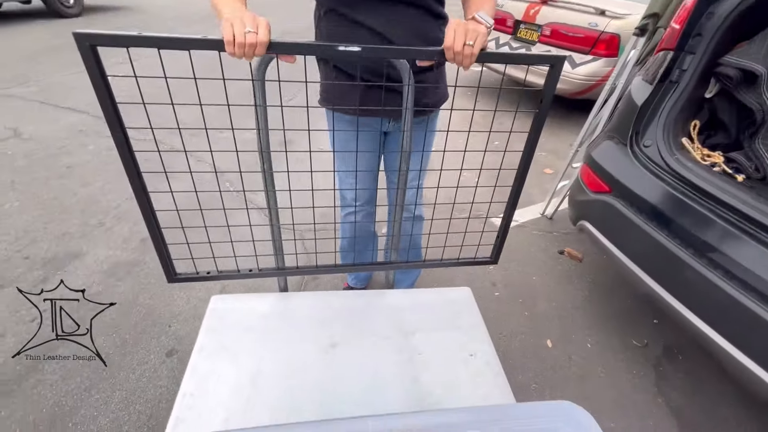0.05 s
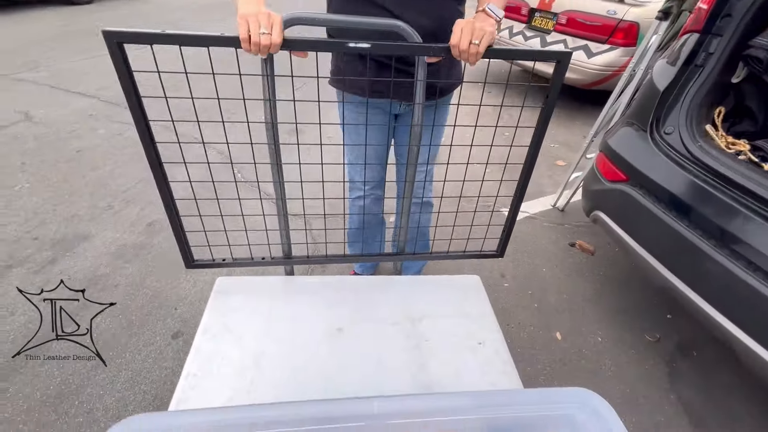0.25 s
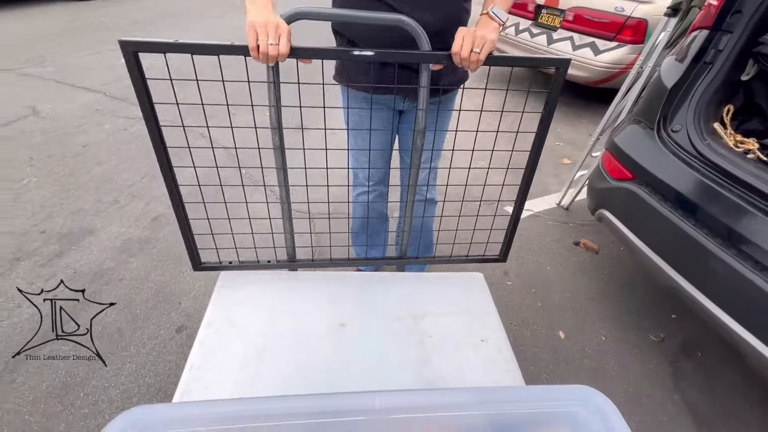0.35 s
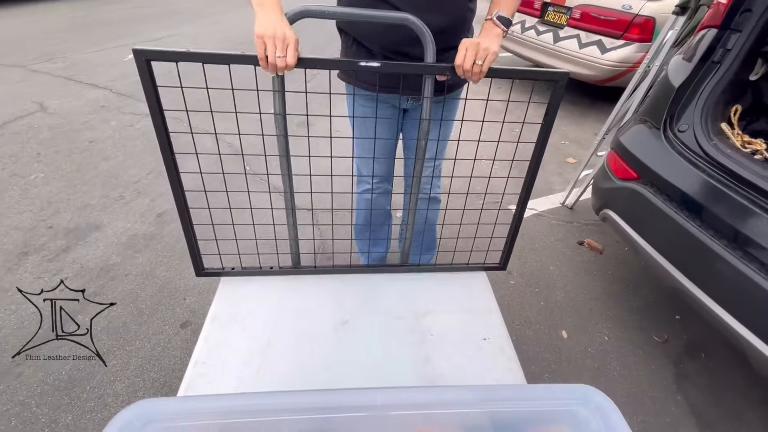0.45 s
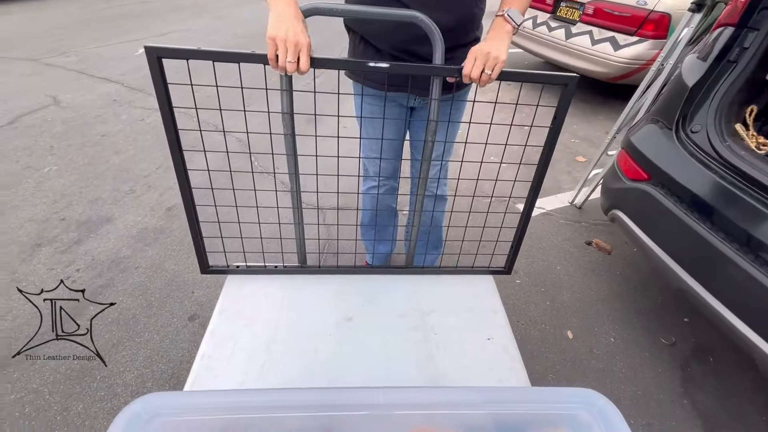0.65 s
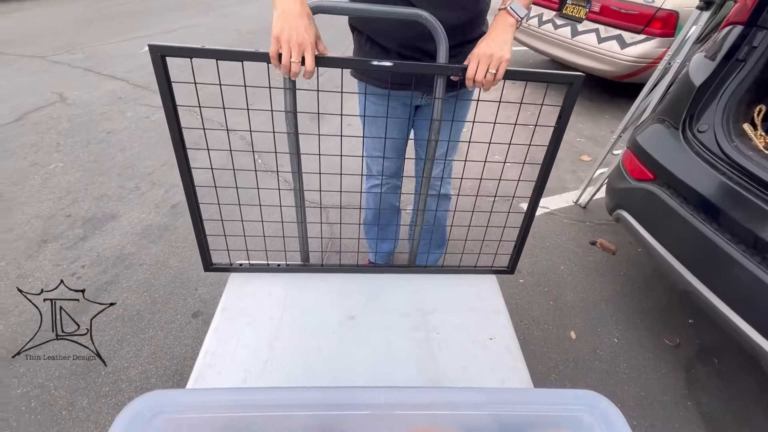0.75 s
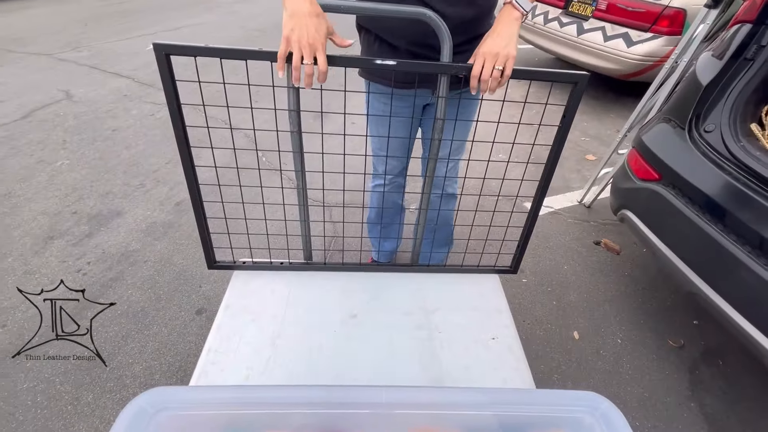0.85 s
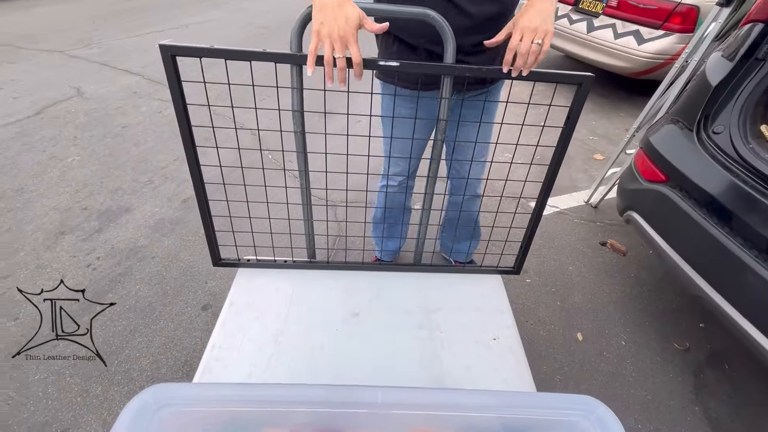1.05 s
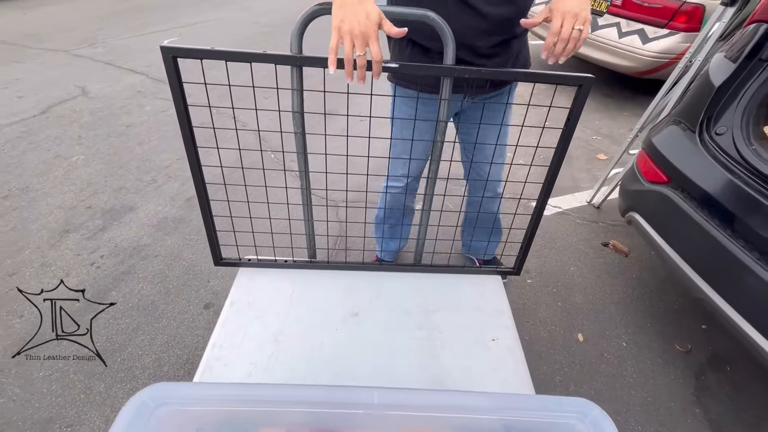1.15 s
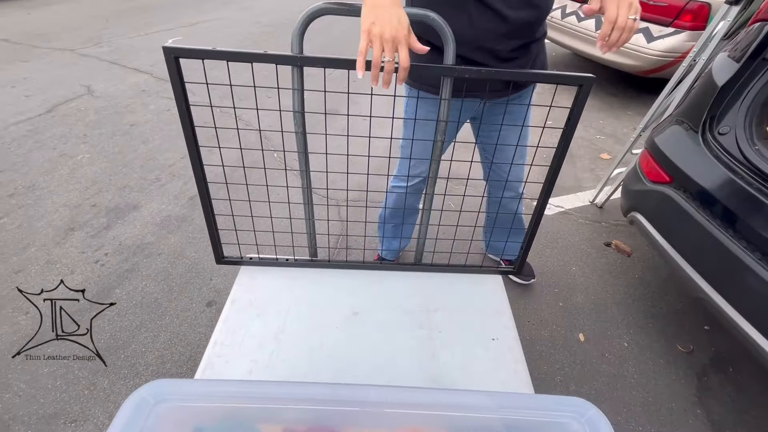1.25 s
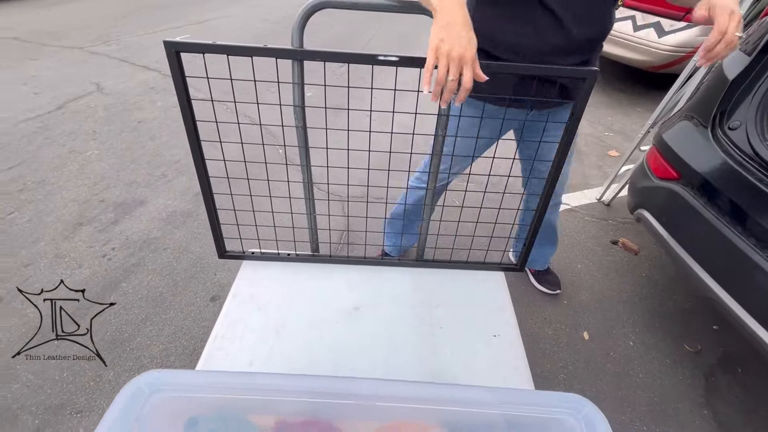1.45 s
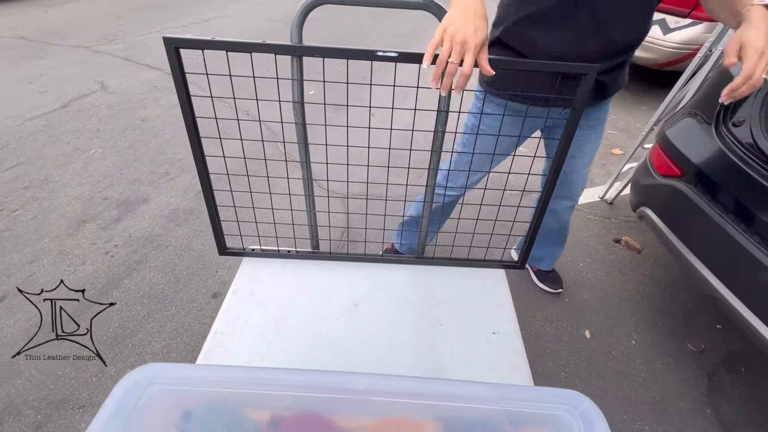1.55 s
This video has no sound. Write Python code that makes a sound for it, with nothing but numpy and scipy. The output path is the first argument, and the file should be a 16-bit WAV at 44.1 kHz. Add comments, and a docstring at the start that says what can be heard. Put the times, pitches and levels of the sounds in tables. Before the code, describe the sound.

A metal wire panel clanks against a cart's handle, then drops onto the plastic deck with a thud and a small bounce, wires ringing. A faint shoe scuff follows. Heard close by, outdoors, over low distant traffic.

```python
"""Wire panel dropped on a cart

In a car park a steel-framed wire panel knocks against a cart's tubular handle, then drops onto its
plastic deck and bounces. Each impact excites damped normal modes: the handle hums, the deck thuds, the
wires ring and chatter against each other. A shoe then scuffs the asphalt, the wires tick faintly and
a hand brushes the frame, over a low rumble of distant traffic."""
import sys
import numpy as np
from scipy import signal
from scipy.fft import rfft, irfft
from scipy.io import wavfile

SR = 44100
rng = np.random.default_rng(int(sys.argv[2]) if len(sys.argv) > 2 else 0)


def store_wav(level_fs):
    """Save 16-bit WAV to argv[1]."""
    pcm = np.round(np.clip(np.atleast_2d(level_fs), -1, 1) * 32767)
    wavfile.write(sys.argv[1], SR, pcm.T.astype(np.int16))


N = 70560
T = np.arange(N) / SR
HZ = np.arange(N // 2 + 1) * SR / N
SIDES = np.array([[1], [-1]])  # left, right
TOP_HZ = 15600


def undb(db):
    """Amplitude ratio of a level in decibels."""
    return 10 ** (np.asarray(db) / 20)


def unit(x):
    """Normalisation to an rms of 1."""
    return x / np.sqrt(np.mean(x ** 2))


def pan(db):
    """Level-difference panning: two gains, the left db above the right."""
    return undb(SIDES * db / 2)


def at_hz(hz, table, column=1):
    """Interpolation of a table's column over log frequency."""
    table = np.array(table, float)
    return np.interp(np.log(np.maximum(hz, 1)), np.log(table[:, 0]), table[:, column])


def through(x, response):
    """Convolution: the output of a linear system with this impulse response."""
    return signal.fftconvolve(np.atleast_2d(x), np.atleast_2d(response), axes=1)[:, :N]


def colour(x, spectrum):
    """Minimum-phase filtering: folding the cepstrum makes the response causal."""
    hz = np.arange(N + 1) * SR / (2 * N)
    cepstrum = irfft(np.log(undb(at_hz(hz, spectrum))))
    cepstrum[1:N] *= 2
    cepstrum[N + 1:] = 0
    return irfft(rfft(x, 2 * N) * np.exp(rfft(cepstrum)))[..., :N]


def fade(t60_s):
    """Exponential decay, by 60 dB in t60_s."""
    return np.exp(-np.log(1000) * T / t60_s)


def build_up(rise_s):
    """First-order rise from 0 towards 1."""
    return 1 - np.exp(-T / rise_s)


def push(start_s, level_db, contact_ms):
    """Force pulse of an impact: the longer the contact, the narrower its bandwidth."""
    age = np.maximum(T - start_s, 0) / (max(contact_ms, .03) / 4000)
    force = age * np.exp(-np.minimum(age, 60))
    return undb(level_db) * force / force.sum()


def ring(modes, spread_rad=0):
    """Superposition of damped modes, each shifted in phase oppositely left and right."""
    return sum(undb(db) * fade(t60) * np.cos(2 * np.pi * hz * T + SIDES * spread_rad * (-1) ** i)
               for i, (hz, db, t60) in enumerate(modes))


def burst(envelope):
    """Diffuse impulse response: enveloped stereo noise of unit energy."""
    return unit(rng.standard_normal((2, N)) * envelope) / np.sqrt(N)


def stereo_noise(correlation):
    """Partial coherence: mid and side noise mix into correlated left and right spectra."""
    alike = at_hz(HZ, correlation)
    mid, side = rfft(rng.standard_normal((2, N)))
    return (mid * np.sqrt(1 + alike) + side * np.sqrt(1 - alike) * SIDES) / np.sqrt(2)


def grains(spells, per_s):
    """Shot noise: tiny random impacts whose strength swells and dies with each spell."""
    envelope = sum(undb(db) * np.clip((T - s) / rise, 0, 1) * np.exp(-np.maximum(T - s - rise, 0) / fall)
                   for s, db, rise, fall in spells)
    impacts = (rng.random(N) < per_s / SR) * rng.standard_normal(N)
    return envelope * unit(impacts)


def rub(spells, spectrum, per_s):
    """Rough contact: filtered shot noise, partly common to left and right."""
    shared, left, right = (grains(spells, per_s) for _ in range(3))
    return colour(undb(-2) * shared + np.array([left, right]), spectrum)


def traffic():
    """Broadband noise of distant traffic: the bass swells, the airy band above it less so."""
    # noise spectrum: frequency_hz, level_db
    spectrum = [(15, -56), (25, -5.5), (64, 0.5), (130, -5.5), (354, -17.5), (439, -23.5), (575, -18),
                (936, -27.5), (1020, -24.5), (1370, -27), (2690, -38), (3430, -40), (5570, -49.5),
                (12500, -63), (16000, -77)]
    # left-right coherence: frequency_hz, correlation
    coherence = [(30, 0.3), (70, 0.27), (150, 0.88), (300, 0.78), (600, 0.04), (2000, 0), (16000, 0)]
    # swell of the bass: time_s, level_db
    swell = [(0, -7), (.3, -1), (.65, 5), (.9, 0), (1.15, 1), (1.4, -2.5), (1.6, -2)]
    crossover_hz = 306
    noise = unit(irfft(undb(at_hz(HZ, spectrum)) * stereo_noise(coherence), N))
    bass = irfft(rfft(noise) / (1 + (HZ / crossover_hz) ** 4), N)
    air = pan(1.5) * (noise - bass)
    swell_db = np.interp(T, *np.array(swell).T)
    return undb(-40 + swell_db) * bass + undb(-38.5 + 0.41 * swell_db) * air


def reflections(direct):
    """Reverberation: parked cars scatter the direct sound into a faint diffuse tail."""
    # response of the reflecting paths: frequency_hz, gain_db
    spectrum = [(50, -7.5), (200, -10.5), (600, 0.5), (2000, 2), (5000, 5), (9000, -14), (15000, -20)]
    tail = burst(fade(t60_s=1) * build_up(0.0074))
    return undb(-13) * colour(through(direct, tail), spectrum)


def hand():
    """Friction noise: a hand brushes the frame as it lets go."""
    # strokes: start_s, level_db, rise_s, fall_s
    strokes = [(1.448, -0.5, 0.0099, 0.071), (1.54, -1, 0.0085, 0.007)]
    # friction spectrum: frequency_hz, level_db
    spectrum = [(400, -5), (1200, -2), (2200, -1), (3800, -1.5), (6000, -5.5), (9000, -12.5), (15000, -14)]
    return undb(-48) * rub(strokes, spectrum, per_s=12000)


def shoe():
    """Friction and fracture: grit crunches under a sole and one piece snaps."""
    # scuffs on asphalt: start_s, level_db, rise_s, fall_s
    scuffs = [(1.105, -8.5, 0.026, 0.09), (1.1412, 3.5, 0.002, 0.0067), (1.161, -2, 0.0028, 0.029),
              (1.195, -2.5, 0.014, 0.023)]
    # crunch spectrum: frequency_hz, level_db
    spectrum = [(80, -24), (200, 5), (450, -4.5), (800, 5.5), (1300, 0.5), (1900, -7), (3500, -10),
                (5000, -15.5), (8000, -25.5), (15000, -36)]
    # modes of the snap: pitch_hz, level_db, t60_s
    snap_modes = [(261, -31, 0.054), (760, -35, .025), (980, -40, 0.024), (2900, -32, 0.045),
                  (3046, -36.5, 0.052)]
    crunch = undb(-32) * rub(scuffs, spectrum, per_s=4000)
    snap = through(push(1.1415, 0, contact_ms=0.21), ring(snap_modes, spread_rad=0.79))
    return crunch + snap


def rocking():
    """Damped oscillator: the cart bumps on its wheels at one low resonance."""
    # bumps: start_s, level_db
    bumps = [(0.565, -33), (0.845, -24.5), (1.12, -23), (1.276, -27.5), (1.386, -30)]
    pitch_hz = 77.6
    response = np.sin(2 * np.pi * pitch_hz * T) * fade(t60_s=0.12) * build_up(0.008)
    return through(sum(push(s, db, contact_ms=0.69) for s, db in bumps), response)


def judder():
    """Intermittent contact: the frame rattles dully against the cart, before and as it lands."""
    # spells of juddering: start_s, level_db, rise_s, fall_s
    spells = [(.28, -10, 0.0082, 0.12), (.431, -5, 0.0033, 0.033), (.488, 3, 0.0043, 0.029)]
    # judder spectrum: frequency_hz, level_db
    spectrum = [(60, -11.5), (150, -7.5), (260, 5.5), (420, 1), (700, -4), (950, -14.5), (1300, -13.5),
                (2500, -28), (8000, -37)]
    return undb(-14) * rub(spells, spectrum, per_s=1200)


def landing():
    """Contact time sets brightness: the steel frame knocks, then the yielding deck thuds."""
    # frame meets deck: start_s, thud_db, thud_contact_ms, knock_db
    landings = [(0.428, -15.5, 1.68, -19.5), (0.4379, -15.5, 2.04, -31), (0.458, -21, 1.6, -35),
                (0.4828, 2.5, 2.17, -0.5), (0.5194, -17.5, 1.5, -36), (.557, -24, 2.9, -15.5)]
    # modes of the plastic deck: pitch_hz, level_db, t60_s
    deck_modes = [(64.6, -26, .4), (137.8, -21, 0.22), (166.3, -9, 0.14), (187, -15, 0.174),
                  (225.6, -15.5, 0.18), (244, -26, 0.183), (281.5, -30, 0.42), (356.5, -24, 0.105),
                  (431, -18.5, 0.18), (464, -31, 0.11), (503, -18.5, 0.099), (657, -19, 0.13),
                  (727, -12, 0.09), (740, -28, 0.24)]
    # modes of the steel frame: pitch_hz, level_db, t60_s
    frame_modes = [(1556, -21, 0.053), (1613, -26.5, .04), (2125, -31, 0.077), (2400, -36, 0.084),
                   (2796, -36, 0.034)]
    # spectrum of the frame's clack: frequency_hz, level_db
    clack_spectrum = [(200, -1), (700, 2.5), (1100, -17), (1650, 12), (2000, 2.5), (2700, -6), (4000, -6),
                      (8000, -14), (15000, -19)]
    deck_lag_s, clack_fall_s, tick_fall_s = 0.006827, 0.0076, 0.0012
    deck_force = sum(push(s + deck_lag_s, db, ms) for s, db, ms, _ in landings)
    thud = through(deck_force, ring(deck_modes, spread_rad=0.05))
    frame_force = sum(push(s, db, contact_ms=0.17) for s, _, _, db in landings)
    clack = undb(7.5) * colour(burst(np.exp(-T / clack_fall_s)), clack_spectrum)
    knock = through(frame_force, ring(frame_modes) + clack)
    # steel touches the deck just ahead of the heaviest landing
    tick = through(push(0.4805, -6.5, contact_ms=0.03), burst(np.exp(-T / tick_fall_s)))
    return thud + pan(3.5) * knock + tick


def handle():
    """Impact excitation: the frame clanks on the tubular handle, whose low modes hum just after."""
    # steel meets handle: start_s, level_db, contact_ms
    contacts = [(0.1971, -6.5, 0.15), (0.2011, 0.5, 0.14), (0.212, -14, 0.26)]
    # short ring of the contact: pitch_hz, level_db, t60_s
    clank_modes = [(1810, -20.5, 0.038), (2202, -23, 0.055), (2710, -24, 0.078), (3030, -28, 0.033),
                   (3990, -24.5, 0.029)]
    # spectrum of the opening crack: frequency_hz, level_db
    crack_spectrum = [(100, -2), (700, 1.5), (1300, 2), (2200, 6.5), (4000, 3), (5600, -12), (9000, 10.5),
                      (15000, -8)]
    # modes of the tube: pitch_hz, level_db, t60_s
    tube_modes = [(104, -49, .3), (198.6, -26, 0.45), (221, -22, 0.15), (279, -31, 0.32), (391, -22, 0.21),
                  (526, -25.5, 0.13), (648, -38.5, 0.35), (790, -30.5, 0.12)]
    crack_fall_s = 0.005
    crack = undb(3.5) * colour(burst(np.exp(-T / crack_fall_s)), crack_spectrum)
    force = sum(push(*contact) for contact in contacts)
    clank = through(force, crack + ring(clank_modes, spread_rad=1))
    hum = ring(tube_modes, spread_rad=0.19) * build_up(0.0032)
    return clank + through(push(0.206, 0, contact_ms=0.1), hum)


def wire_response():
    """Modal overlap: countless wire modes merge into noise whose highest bands die soonest."""
    # dense wire modes: frequency_hz, level_db, t60_s
    bands = [(696.4, 4, 0.74), (1117, -2, 0.61), (2200, -2, 1), (4360, 0.5, 0.94), (5640, -3.5, 0.8),
             (6200, 5, 0.79), (9300, -1.5, 0.24), (13000, 2, 0.17), (16000, -4, 0.157)]
    # left-right coherence: frequency_hz, correlation
    coherence = [(700, 0.1), (2000, -0.4), (4500, 0.059), (8000, -0.45), (13000, 0.62)]
    spectrum = stereo_noise(coherence) * undb(at_hz(HZ, bands))
    edges_hz = np.geomspace(bands[0][0], TOP_HZ, 15)
    response = np.zeros((2, N))
    for low, high in zip(edges_hz, edges_hz[1:]):
        band = irfft(spectrum * (HZ >= low) * (HZ < high), N)
        response += band * fade(at_hz(np.sqrt(low * high), bands, column=2))
    return response


def chatter(wires):
    """Random collisions: loose wires strike each other and ring briefly, damped by the contact."""
    # spells of chattering: start_s, level_db, rise_s, fall_s
    spells = [(.216, -1, 0.003, 0.038), (.30, -25, 0.016, 0.082), (.44, -20, 0.0074, 0.05),
              (.493, -12.5, 0.017, 0.011), (.525, -17, 0.0044, 0.015), (.70, -37.5, 0.024, 0.033),
              (.81, -31, 0.013, 0.012), (1.365, -25.5, .002, 0.0039), (1.40, -41.5, 0.011, 0.033),
              (1.54, -25.5, 0.0042, 0.0051)]
    # collision spectrum: frequency_hz, level_db
    spectrum = [(500, -23), (2000, -28), (4500, 1), (7000, -3), (9200, 3.5), (10500, 1), (13000, 1.5),
                (14500, 0), (16000, -25)]
    # thin ring of the wires: pitch_hz, level_db, t60_s
    thin_modes = [(6530, -35, 0.194), (8800, -45, 0.19), (9290, -43.5, 0.12), (11258, -55, .15),
                  (12600, -49, 0.12), (13959, -43, .15)]
    # stereo balance: frequency_hz, left_minus_right_db
    balance = [(2000, -8), (4500, 7.5), (8000, -6), (12000, -3.5), (15000, 5)]
    damping_s = 0.084
    damped = unit(wires * np.exp(-T / damping_s)) / np.sqrt(N)
    collisions = colour(grains(spells, per_s=1100), spectrum)
    rattle = through(collisions, damped + ring(thin_modes, spread_rad=0.37))
    return undb(-22.5) * irfft(rfft(rattle) * pan(at_hz(HZ, balance)), N)


def panel():
    """Free vibration: blows ring the grid until the deck damps it; its loose wires chatter on."""
    # blows to the grid: start_s, level_db, contact_ms
    blows = [(.198, 2.5, 0.11), (0.427, -12.5, 0.05), (0.4818, -5, 0.11), (.557, -11, 0.32)]
    # strongest modes of the free grid: pitch_hz, level_db, t60_s
    grid_modes = [(1911, -36, .55), (2049, -38.5, .75), (2150, -44, .4), (2390, -49, 1.), (2422, -44, .5),
                  (2803, -51, 1.), (3215, -43, .6), (3343, -51, .8), (4284, -38, .6), (4721, -41, .55),
                  (4791, -37, .45), (5464, -40, .45), (6336, -40, .42), (6686, -38, .4)]
    damped_from_s, damping_db_per_s = 0.37, 13
    wires = wire_response()
    force = sum(push(*blow) for blow in blows)
    loss_db = damping_db_per_s * np.maximum(T - damped_from_s, 0)
    tones = undb(1.5 - loss_db) * through(force, ring(grid_modes, spread_rad=0.79))
    shimmer = undb(-24) * through(force, wires)
    return tones + shimmer + chatter(wires)


def scene():
    """Superposition of the near sources, their reflections and the traffic."""
    direct = panel() + handle() + landing() + rocking() + judder() + shoe() + hand()
    return direct + reflections(direct) + traffic()


def record(dry):
    """Band limiting: filters remove the deepest bass and the highest treble."""
    low_cut = signal.butter(3, 60, "highpass", fs=SR, output="sos")
    high_cut = signal.ellip(8, .2, 70, TOP_HZ, fs=SR, output="sos")
    return signal.sosfilt(high_cut, signal.sosfilt(low_cut, dry))


dry = scene()
out = record(dry)
store_wav(out)
```